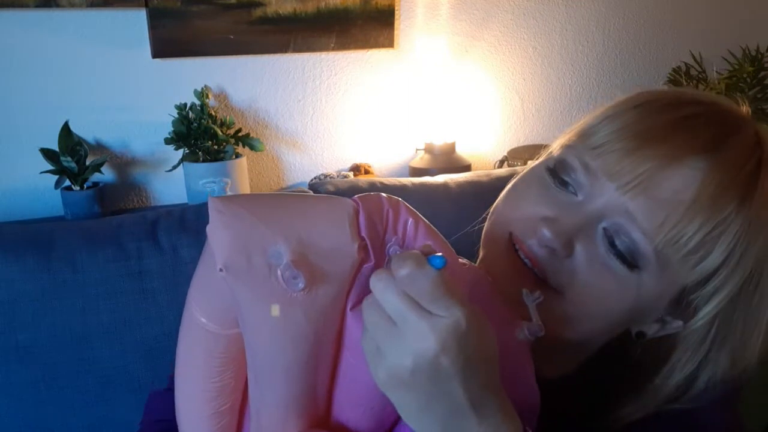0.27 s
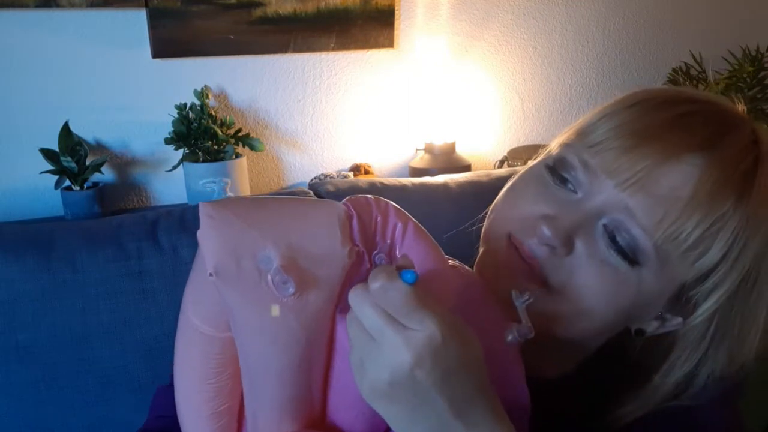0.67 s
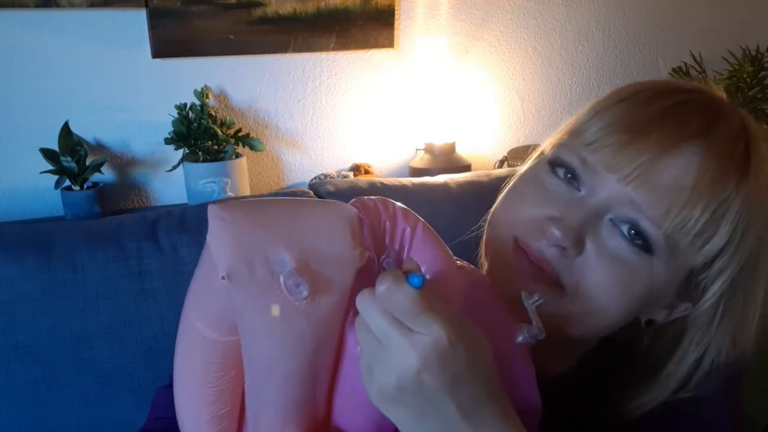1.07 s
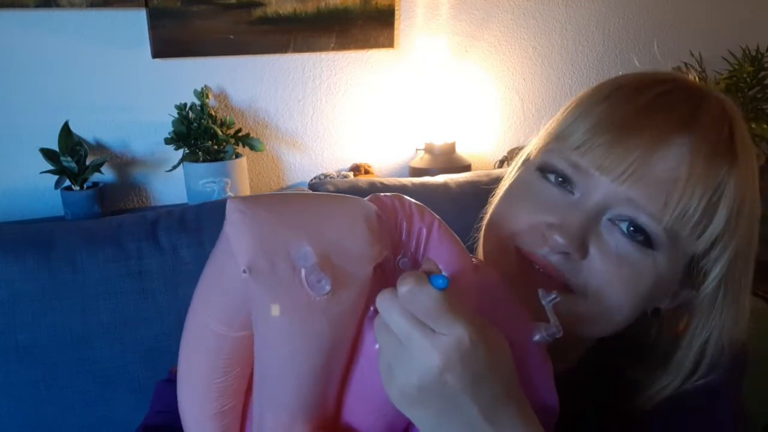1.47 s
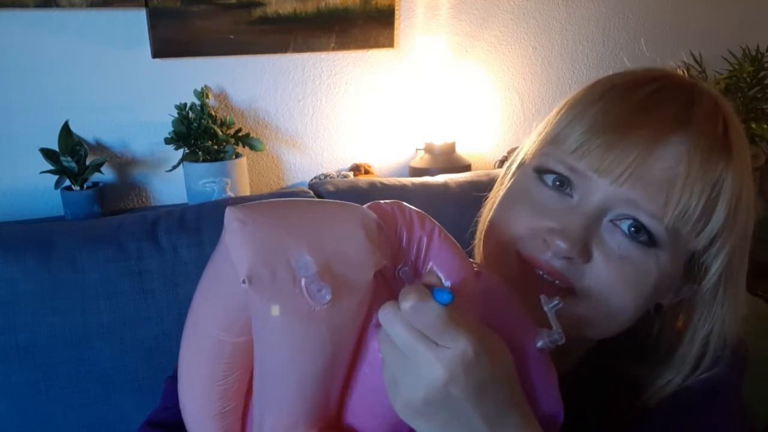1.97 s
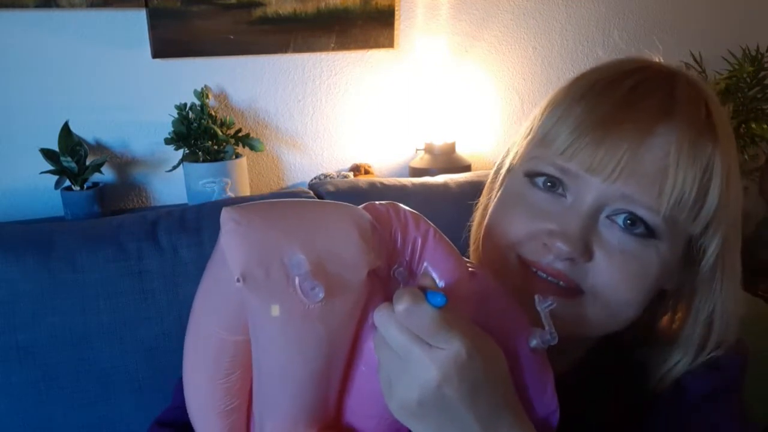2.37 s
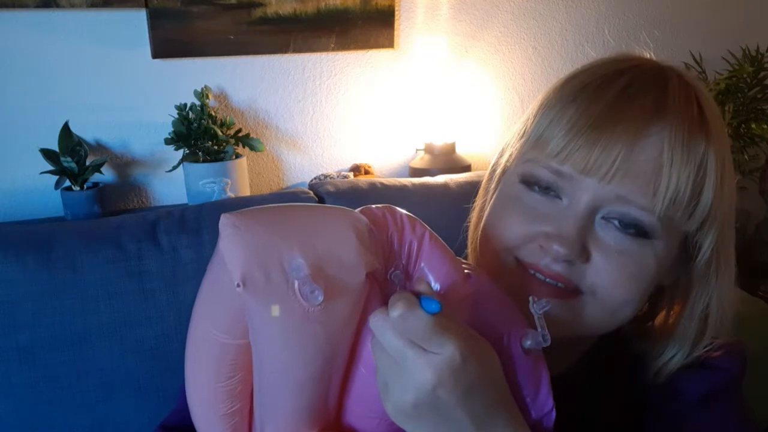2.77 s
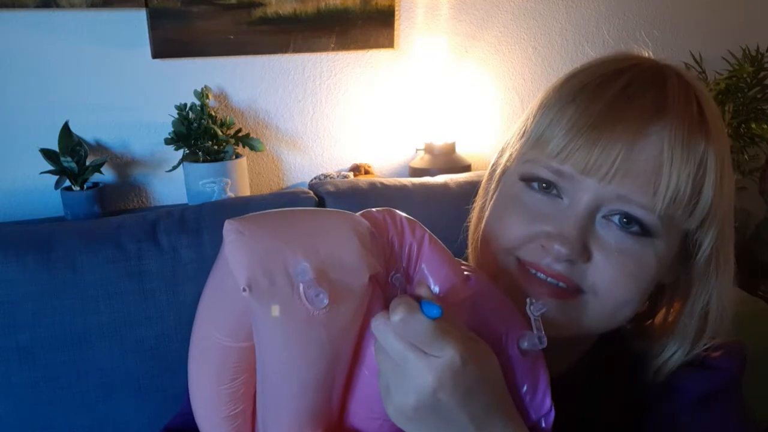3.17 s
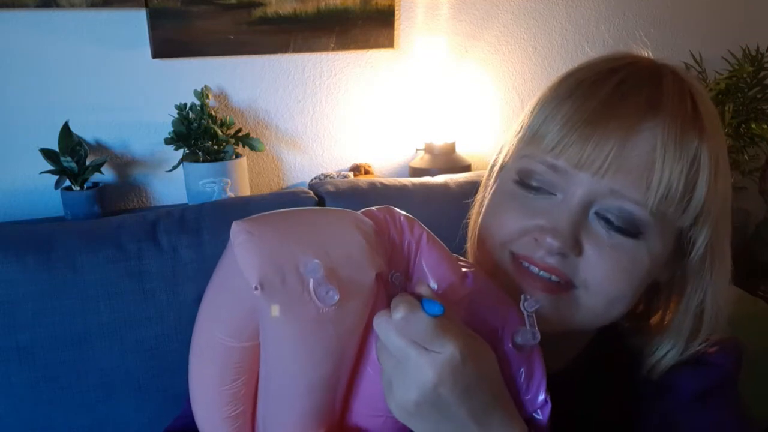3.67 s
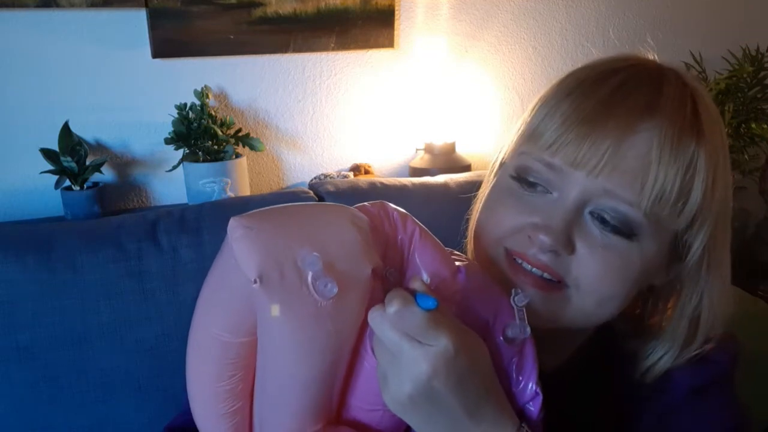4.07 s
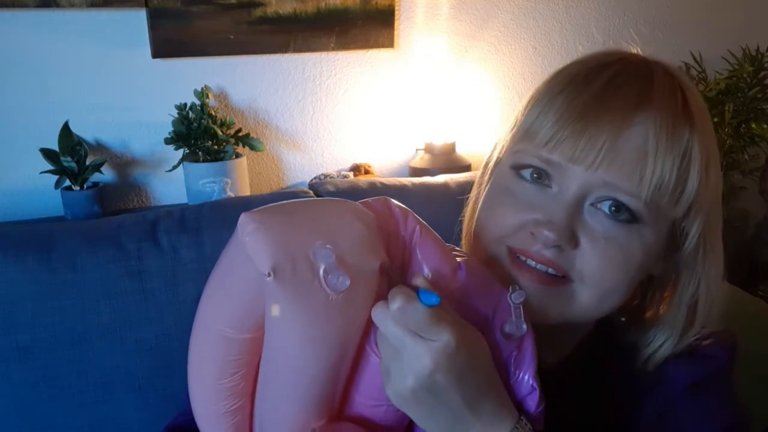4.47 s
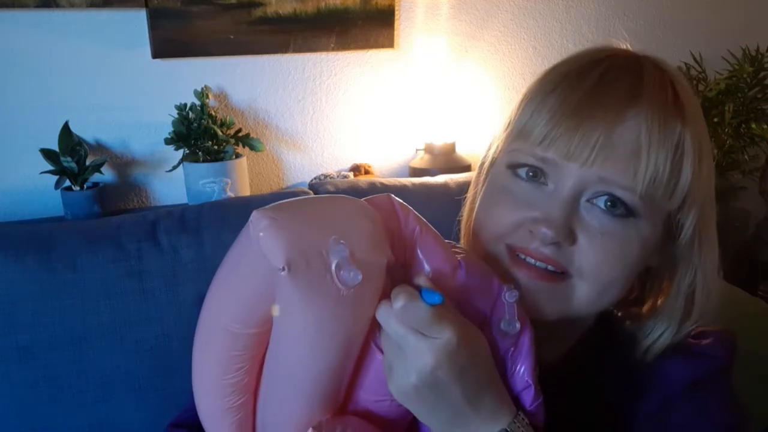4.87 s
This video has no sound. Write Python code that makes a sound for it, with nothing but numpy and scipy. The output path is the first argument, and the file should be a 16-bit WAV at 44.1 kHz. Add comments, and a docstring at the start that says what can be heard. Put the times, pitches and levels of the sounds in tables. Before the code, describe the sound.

From the very start, air hisses out of the pinched valve of a vinyl inflatable, close to the microphone. The hiss is bright and continuous, with a breathy, slightly hollow ring that wanders gently in pitch and a soft rush beneath it. At about 0.6 seconds the valve begins to widen and the flow swells, reaching its strongest around 1.5 seconds, when a fine high sizzle joins in. Near 1.8 seconds the valve turns, shifting the top of the hiss between left and right; it shifts back at about 3.6 seconds. The flow stays strong until roughly 2.5 seconds, then gradually eases, its tone alternating between thinner and hollower. It is softer after 4.3 seconds but still running at the end, around 5 seconds. The living room adds only very short reflections and a very faint low drone.

```python
"""Air hisses from the pinched valve of a vinyl inflatable in a quiet living room, over a faint low drone.
From the start the turbulent jet sounds through the valve's stem and chamber, and the walls echo it.
At 0.6 s the valve starts to widen slowly; the flow swells, and by 1.5 s the flap's edge sizzles.
Near 1.8 s the hand turns the valve, swinging the treble between left and right, and at 3.6 s turns it back.
Chamber and stem keep trading strength as the flow eases toward the end."""
import sys
import numpy as np
from scipy import signal
from scipy.fft import rfft, irfft
from scipy.io import wavfile
from scipy.ndimage import uniform_filter1d

SR = 44100
rng = np.random.default_rng(int(sys.argv[2]) if len(sys.argv) > 2 else 0)


def transcribe(u):
    """Save the signal u as a 16-bit wav file named by the first command-line argument.

    u: samples, shape (n,) or (channels, n), limited to [-1, 1]; the rate is SR.
    q: integer samples, one column per channel.
    """
    v = np.clip(np.atleast_2d(u).T, -1, 1)
    q = np.round(v * 32767).astype(np.int16)
    wavfile.write(sys.argv[1], SR, q)


N = 225542
FRAME, HOP = 1024, 256
HZ = np.fft.rfftfreq(FRAME, 1 / SR)
TIMES = np.arange(-(-N // HOP) + 1)[:, None] * HOP / SR
OPENING_STARTS_S, FULLY_OPEN_S = 0.61, 5.4  # the sound ends just short of fully open

# Push of the air, the control that rides every valve layer: time_s, flow_db
AIR_FLOW = [(0, -3.5), (.24, -5.5), (.38, -2.5), (.72, -2.5), (.9, -.5), (1.03, -0.4), (1.15, 1.5),
            (1.38, 2.5), (1.54, 4), (2.05, 3.5), (2.48, 3.5), (2.6, 3), (2.8, 2), (3.7, 0.72), (4.05, 0.5),
            (4.35, -2.5), (4.65, -3), (5.11, -4.5)]
# Balance control, up for more chamber and down for more stem: time_s, trade_db
RESONANCE_TRADE = [(0, -14), (.4, -11), (.87, -9.5), (1.24, -5.5), (1.36, -3), (1.53, -1.5), (1.66, -1),
                   (1.76, -6), (1.84, 3), (2.07, 2), (2.33, 0.3), (2.47, -3), (2.54, -6), (2.8, -9),
                   (3.25, -6.5), (3.47, 0), (4.12, 3), (4.3, 1), (4.6, 0.5), (4.75, -2.5), (5.11, -8)]
# Mix of the valve layers by name, positive pan to the left:
# base_level_db, db_per_flow_db, db_per_trade_db, opening_lift_db, pan_db, opening_pan_db
LAYER_MIX = {"jet": (-37, 0.56, 0.13, -3.5, 1, 1.5), "rush": (-53.5, 0.86, 0.12, 5, 0.5, -1),
             "chamber": (-39.9, 1.45, 0.63, -0.7, 0.5, 1), "pocket": (-52.5, 1.1, 0.4, -3.5, 0, -3),
             "stem": (-40, 0.97, -0.2, -1.46, 1.5, -0.5), "gap": (-46, 2.09, -0.1, 8, -1.5, -1.5),
             "overtone": (-49.5, 1.7, 0, 3, 7.5, -24), "sizzle": (-62, 3, 2, -2, 3, 2)}
# Tone of the jet's broad hiss: frequency_hz, level_db
HISS_TONE = [(300, -35), (1000, -10), (2300, 0), (4000, -1), (6300, 0), (9000, 0), (10200, -1.5),
             (11500, -1), (12200, 1), (13300, -.5), (14400, .3), (16000, 0)]
# Tone of the low rush under the hiss: frequency_hz, level_db
RUSH_TONE = [(40, -42), (150, -22), (235, -20), (300, -8), (385, -6), (450, -3.7), (560, -1.5), (750, .6),
             (1000, -.6), (1350, 1.3), (1800, -6), (3000, -25)]
# Brief puffs and lulls in the rush: centre_s, half_length_s, lift_db
RUSH_PUFFS = [(0.152, 0.1, 5), (0.42, 0.06, -2), (0.558, 0.029, 5.5), (1.353, 0.11, 3.5), (2.094, 0.2, 3),
              (2.502, 0.15, 7.5), (3.195, 0.038, -5), (4.543, 0.27, 2), (4.9, 0.15, 4)]
# Resonance of the valve's stem: time_s, pitch_hz
STEM_PITCH = [(0.0, 3140), (0.6, 3150), (0.87, 3030), (1.11, 2980), (1.5, 3050), (1.76, 3000), (2.5, 3030),
              (2.85, 3200), (3.12, 3000), (3.3, 2780), (4.61, 2990), (5.0, 2870)]
# Resonance of the valve's chamber: time_s, pitch_hz
CHAMBER_PITCH = [(0, 1780), (.4, 1890), (1.25, 1860), (1.48, 1770), (1.6, 1830), (2.05, 1840), (2.33, 1790),
                 (2.41, 1760), (2.48, 1580), (2.55, 1860), (3.2, 1930), (3.48, 1860), (3.8, 1920),
                 (4.22, 1940), (4.48, 1670), (5.11, 1720)]
# Peaks and hollows of the folded vinyl passage:
# pinched_hz, open_hz, width_hz, left_db, right_db, db_per_flow_db, opening_lift_db
VINYL_FOLDS = [(2420, 2300, 320, -2.2, -2.2, -.15, 2), (6600, 6200, 3400, -2.8, -2, .2, 2.5),
               (6950, 6950, 600, -.5, 2.6, .2, -1.5), (9400, 6400, 600, -.5, 0, .1, -6),
               (9600, 9800, 1200, 1.8, .5, .3, -4), (10750, 11000, 900, .3, 0, -.45, 4),
               (12450, 13300, 1200, 4.7, 2.1, -.2, -4), (14400, 14650, 650, -.7, .6, .05, 3.5),
               (15300, 15600, 1100, 4, .3, -.8, -6)]
# Bands of hiss that swell or dip in passing:
# centre_s, half_length_s, frequency_hz, width_hz, left_db, right_db
HISS_SWELLS = [(.3, .35, 8500, 900, -10, -8), (0.358, 0.18, 2150, 500, 5, 3.5),
               (0.755, 0.14, 485, 500, -8, -8), (.76, 0.077, 1170, 600, 2, 2), (.8, .25, 13900, 900, 1, 10),
               (1.097, 0.5, 5600, 1320, 9.5, 4), (1.1, .35, 15400, 1200, -11, -1),
               (1.2, 0.39, 7160, 1000, 2, 3), (1.4, 0.44, 9200, 1400, 1.8, -7),
               (1.66, .13, 13800, 1200, 2, 4), (1.73, .06, 2750, 500, 4.5, 3), (2, 0.16, 320, 250, 7, 6),
               (2.38, 0.2, 3700, 704, -4, -2.5), (2.508, 0.2, 644, 403, 2.5, 2),
               (1.67, 0.11, 3140, 1300, 2.5, 3.5), (2.5, 0.48, 10400, 2200, -5, -3),
               (2.5, 0.62, 12900, 1200, 4.5, 0), (2.923, 0.47, 3530, 600, 1.5, 1.5),
               (2.8, .25, 5850, 600, -6, -4), (3.05, .35, 7070, 600, 3, 4), (3.2, 0.53, 8740, 600, -3, -1),
               (3.147, 0.76, 5020, 1890, -5, -8.5), (3.2, .13, 3230, 800, 3, 3.5),
               (3.5, 0.36, 3970, 500, -5, -2.5), (3.85, 0.28, 10700, 700, 5, 0),
               (4.4, .3, 6800, 450, 3, -4.5), (4.5, 1, 13500, 900, -10, 2), (4.6, .45, 8200, 600, 2, 2),
               (4.85, 0.37, 7200, 1300, 5, -1), (5.05, 0.18, 2960, 500, 2.2, 2.2),
               (5.1, 0.4, 10470, 900, -16, -14)]
# Standing waves between the vinyl and the walls: frequency_hz, width_hz, lift_db
STANDING_WAVES = [(1355, 32, 5), (1475, 43, 4), (1605, 20, 3), (1792, 38, 2), (1923, 28, 3.2),
                  (2009, 24, 3.5), (2090, 30, 4), (2235, 27, 2), (2369, 27, 4), (2666, 27, 3),
                  (2830, 50, 2), (3123, 32, 3), (3396, 43, 3.5), (4140, 38, 2)]
# How much of the echo the moving hand scrambles: frequency_hz, scrambled_share
ECHO_BLUR = [(900, 0.18), (1400, 0.33), (2500, 0.25), (5000, 0.59), (9000, 0.82)]
# Stereo image, with the left side's phase lead and what opening and turning add to it:
# frequency_hz, direct_share, lead_rad, opening_lead_rad, turned_lead_rad
STEREO_IMAGE = [(100, 0.67, .2, 0.5, 0.5), (705, 0.83, .17, -0.7, 0), (1570, 0.69, 0.16, 1, -0.5),
                (2920, 0.86, 1.1, -0.96, 0), (3600, 0.82, 0.78, 0, -0.24), (4220, 0.58, 1.98, -0.84, 0),
                (4980, 0.7, 3.1, -0.5, -0.8), (6000, 0.5, 1.9, -4.5, -1.8), (6900, 0.56, 0.5, -2.5, 2),
                (7360, 0.32, 2.1, 0.2, -3), (7840, 0.52, 4.2, -1.6, -2.5), (8800, 0.54, 5.4, -2, -6),
                (9600, 0.5, 4.2, -3, -4), (11250, 0.35, 4.9, 3, -9), (12000, 0.2, 6, 0, -4),
                (13050, 0.24, 3.7, -1, -1.5), (14050, 0.6, 4.9, 0, -6), (15150, .42, 5.7, -0.5, -0.5)]
# Tone of the room's drone: frequency_hz, level_db
DRONE_TONE = [(20, -24), (40, -18), (60, -11), (76, -6), (101, 3.5), (125, -5), (165, 0), (210, -9.5),
              (300, 1), (500, -16), (1500, -19.5)]
# The drone swells and sinks: centre_s, half_length_s, lift_db
DRONE_RIDES = [(.75, .12, -3.5), (1.12, .15, 4.5), (1.9, 0.33, 3), (4.4, 0.18, 0)]


def from_db(db):
    """Decibels to gain."""
    return 10 ** (np.asarray(db) / 20)


def unit(x):
    """Scales to rms 1."""
    return x / np.sqrt(np.mean(abs(x) ** 2) + 1e-20)


def follow(curve):
    """An automation curve at the frame times."""
    return np.interp(TIMES, *np.transpose(curve))


def over_hz(rows, hz):
    """Each column of a spectrum table, interpolated over log frequency."""
    points_hz, *columns = np.transpose(rows)
    return [np.interp(np.log(hz + 1), np.log(np.sort(points_hz) + 1), column) for column in columns]


def bell(x, centre, half_width):
    """A smooth hump of height 1."""
    return np.exp(-((x - centre) / half_width) ** 2)


def resonance(centre_hz, width_hz):
    """Gain of a two-stage resonance with steep skirts."""
    return 1 / (1 + ((HZ ** 2 - centre_hz ** 2) / ((HZ + 1) * width_hz)) ** 2)


def flutter(depth_db, frames):
    """Random level drift in dB, smooth over some frames."""
    return depth_db * unit(uniform_filter1d(rng.standard_normal(TIMES.shape), frames, axis=0))


def both_sides(left, right):
    """A stereo pair of values, ready to spread over time and frequency."""
    return np.array([left, right])[:, None, None]


def as_valve_opens(pinched=0, wide=1):
    """A setting that glides from its pinched to its wide-open value."""
    opening = np.clip((TIMES - OPENING_STARTS_S) / (FULLY_OPEN_S - OPENING_STARTS_S), 0, 1)
    return pinched + (wide - pinched) * opening


def layer_power(name, shape, extra_db=0):
    """Stereo power spectrum of one layer, its level and pan riding the valve's controls."""
    base_db, per_flow, per_trade, opening_db, pan_db, opening_pan_db = LAYER_MIX[name]
    ride_db = per_flow * follow(AIR_FLOW) + per_trade * follow(RESONANCE_TRADE)
    level_db = base_db + ride_db + as_valve_opens(0, opening_db) + extra_db
    side_db = both_sides(.5, -.5) * (pan_db + as_valve_opens(0, opening_pan_db))
    return from_db(level_db + side_db) ** 2 * shape ** 2 / np.sum(shape ** 2, axis=-1, keepdims=True)


def jet_hiss():
    """The turbulent jet lays down a broad, bright bed of hiss."""
    return layer_power("jet", from_db(over_hz(HISS_TONE, HZ)[0]))


def low_rush():
    """The jet's puffing low body, brighter through a narrow gap."""
    octaves = np.log2(np.clip(HZ, 300, 1100) / 1000)
    tilt_db = as_valve_opens(4.5, 2.5) * octaves
    puffs_db = sum(db * bell(TIMES, s, half_s) for s, half_s, db in RUSH_PUFFS)
    return layer_power("rush", from_db(over_hz(RUSH_TONE, HZ)[0] + tilt_db), puffs_db)


def stem_ring():
    """The stem resonates, losing its sharpness as the valve opens."""
    return layer_power("stem", resonance(follow(STEM_PITCH), width_hz=as_valve_opens(1070, 1640)))


def stem_overtone():
    """The stem's high overtone sinks a little as the valve opens."""
    pitch_hz = as_valve_opens(8060, 7620)
    return layer_power("overtone", resonance(pitch_hz, width_hz=1050 * (1060 / 1050) ** as_valve_opens()))


def chamber_ring():
    """The valve's chamber resonates with a breathy, wandering pitch."""
    return layer_power("chamber", resonance(follow(CHAMBER_PITCH), width_hz=530))


def air_pocket():
    """The air pocket behind the valve gives the chamber a hollow lower shoulder."""
    return layer_power("pocket", resonance(centre_hz=1510, width_hz=350))


def flap_gap():
    """The gap at the flap sounds lower as it widens."""
    return layer_power("gap", resonance(centre_hz=as_valve_opens(4520, 3340), width_hz=2020))


def vinyl_folds_db():
    """The folded passage carves peaks and hollows that glide as the valve opens."""
    flow_db = follow(AIR_FLOW)
    eq_db = 0
    for pinched_hz, open_hz, width_hz, left_db, right_db, per_flow, opening_db in VINYL_FOLDS:
        lift_db = both_sides(left_db, right_db) + per_flow * flow_db + as_valve_opens(0, opening_db)
        eq_db += lift_db * bell(HZ, as_valve_opens(pinched_hz, open_hz), width_hz / 2)
    return eq_db


def hiss_swells_db():
    """Narrow bands of the hiss swell or dip for a moment."""
    return sum(both_sides(left_db, right_db) * bell(TIMES, s, half_s) * bell(HZ, hz, width_hz / 2)
               for s, half_s, hz, width_hz, left_db, right_db in HISS_SWELLS)


def finger_ripple_db(treble_depth_db=1.5):
    """Reflections off the slowly moving fingers comb the treble with drifting ripples."""
    ripple = rng.standard_normal((len(TIMES), len(HZ)))
    for _ in range(2):
        ripple = uniform_filter1d(ripple, size=55, axis=0)  # slow in time
        ripple = uniform_filter1d(ripple, size=4, axis=1)  # fine in frequency
    return treble_depth_db * unit(ripple) * np.minimum(HZ / 7000, 1)


def wall_echoes(sound, t60_s=0.11, echoes_per_s=3000, predelay_s=.003):
    """Dense reflections of random sign die away, different left and right."""
    t = np.arange(SR // 3) / SR
    taps = rng.choice([-1., 1.], (2, len(t))) * (rng.random((2, len(t))) < echoes_per_s / SR)
    tail = taps * from_db(-60 * t / t60_s) * (t > predelay_s)
    tail /= np.linalg.norm(tail, axis=1, keepdims=True)
    return irfft(rfft(sound) * rfft(tail, N), N)


def turbulence():
    """Short-time stereo spectra of the jet's raw noise, heard direct and off the walls."""
    hz = np.fft.rfftfreq(N, 1 / SR)
    standing_db = sum(db * bell(hz, mode_hz, width_hz / 2) for mode_hz, width_hz, db in STANDING_WAVES)
    standing_db -= uniform_filter1d(standing_db, size=2000)  # dips flank the peaks
    noise = irfft(rfft(rng.standard_normal(N)) * from_db(standing_db), N)
    paths = noise, wall_echoes(noise), rng.standard_normal((2, N))
    direct, steady, scrambled = (
        signal.stft(path, nperseg=FRAME, noverlap=FRAME - HOP)[2].swapaxes(-1, -2) for path in paths)
    blur = np.clip(over_hz(ECHO_BLUR, HZ)[0], 0, 1)  # short waves feel the smallest movement
    echoes = np.sqrt(1 - blur) * steady + np.sqrt(blur) * scrambled
    direct_share, lead_rad = valve_aim()
    direct_pair = np.array([direct, direct * np.exp(-1j * lead_rad)])
    return np.sqrt(direct_share) * direct_pair + np.sqrt(1 - direct_share) * echoes


def room_drone(base_db=-67.5, side_db=-7):
    """Faint wavering rumble of the room, strongest at one low mode."""
    tone = from_db(over_hz(DRONE_TONE, np.fft.rfftfreq(N, 1 / SR))[0])
    mid, side = irfft(rfft(rng.standard_normal((2, N))) * tone, N)
    side *= from_db(side_db)
    swells_db = sum(db * bell(TIMES, s, half_s) for s, half_s, db in DRONE_RIDES)
    waver_db = flutter(depth_db=1, frames=25) + swells_db
    level_db = base_db + np.interp(np.arange(N) / SR, TIMES[:, 0], waver_db[:, 0])
    return from_db(level_db) * unit(np.array([mid + side, mid - side]))


def flap_sizzle():
    """The flap's edge sizzles when the flow is strong and the chamber comes forward."""
    return layer_power("sizzle", resonance(centre_hz=13200, width_hz=1100))


def valve_aim(turn_s=1.77, turn_back_s=3.6, turning_s=0.16):
    """Direct share and left phase lead: the image drifts as the valve opens and swings as it turns."""
    opening = as_valve_opens()
    direct_share, lead_rad, drift_rad, swing_rad = over_hz(STEREO_IMAGE, HZ)
    turned = np.clip(np.minimum(TIMES - turn_s, turn_back_s - TIMES) / turning_s + .5, 0, 1)
    # The pinching fingers scatter some of the direct treble.
    scattered = 0.39 * (1 - opening) ** 2 * np.minimum(HZ / 8000, 1) ** 2
    direct_share = np.clip(direct_share * (1 - scattered), 0, 1)
    return direct_share, lead_rad + drift_rad * opening + swing_rad * turned


def escaping_air():
    """Trembling turbulence, coloured by the valve's layers and the folded passage."""
    power = (jet_hiss() + low_rush() + stem_ring() + stem_overtone()
             + chamber_ring() + air_pocket() + flap_gap() + flap_sizzle())
    # The finest eddies follow the jet's speed most, so the treble trembles most.
    tremble_db = flutter(depth_db=0.62, frames=4) * np.minimum(HZ / 8000, 1)
    eq_db = vinyl_folds_db() + hiss_swells_db() + tremble_db + finger_ripple_db()
    spectra = turbulence() * np.sqrt(power * len(HZ)) * from_db(eq_db)
    return signal.istft(spectra.swapaxes(1, 2), nperseg=FRAME, noverlap=FRAME - HOP)[1][:, :N]


def scene():
    """The hissing valve up close, the room's drone underneath."""
    return escaping_air() + room_drone()


def record(dry):
    """A steep low-pass trims the very top of the hiss."""
    cutoff_hz = 15830
    lowpass = signal.firwin(801, cutoff_hz, window=("kaiser", 9), fs=SR)
    return signal.oaconvolve(dry, lowpass[None], "same", axes=1)


dry = scene()
out = record(dry)
transcribe(out)
```